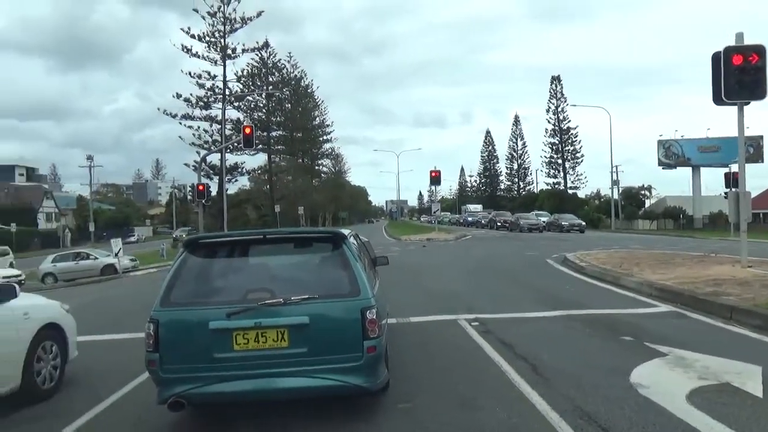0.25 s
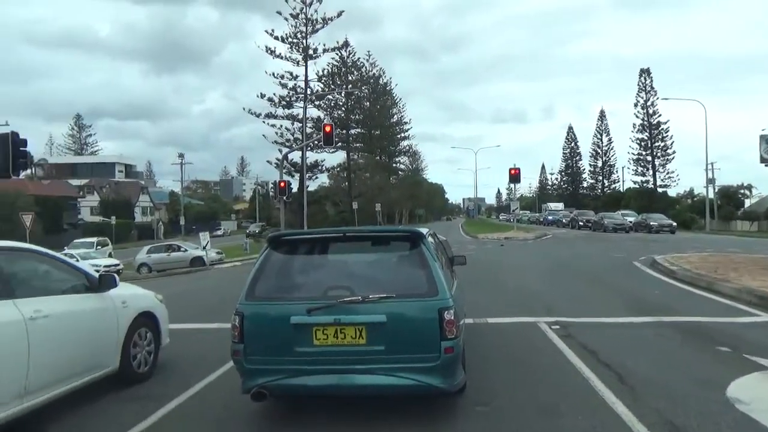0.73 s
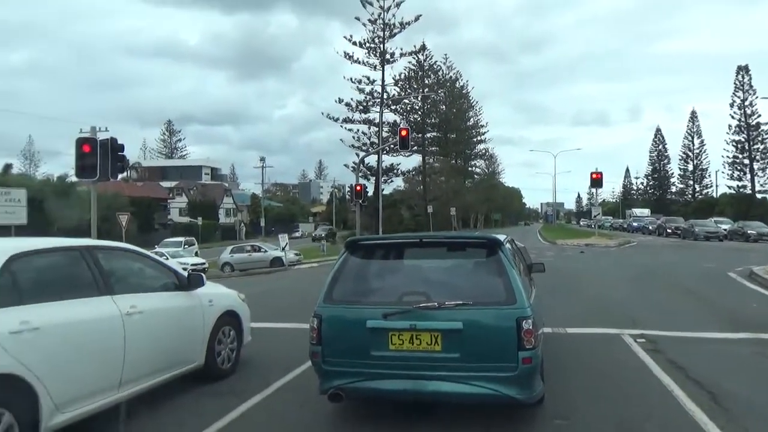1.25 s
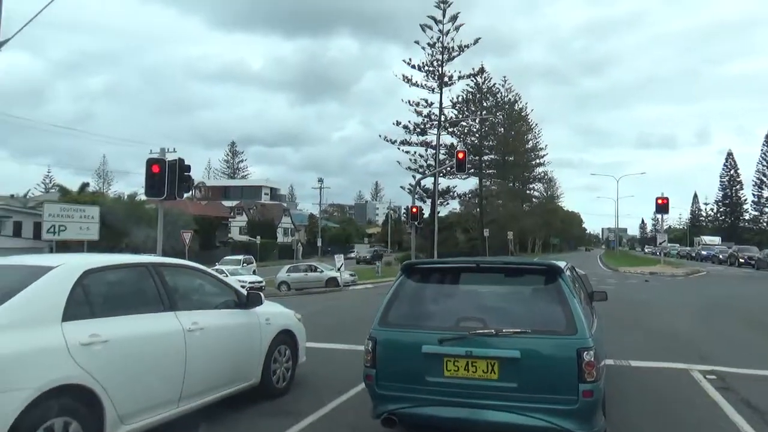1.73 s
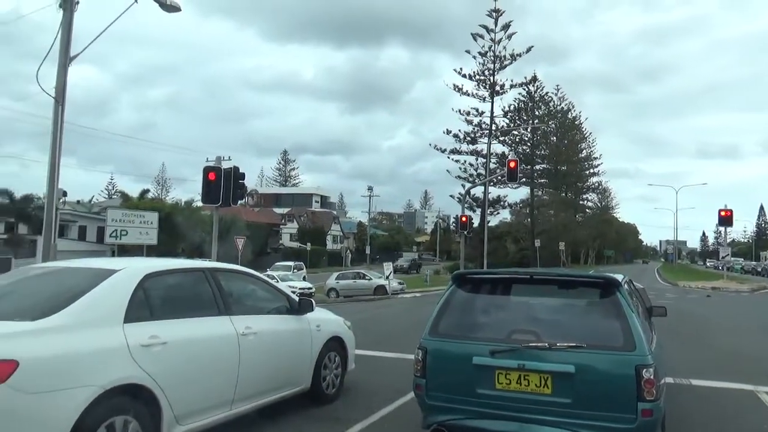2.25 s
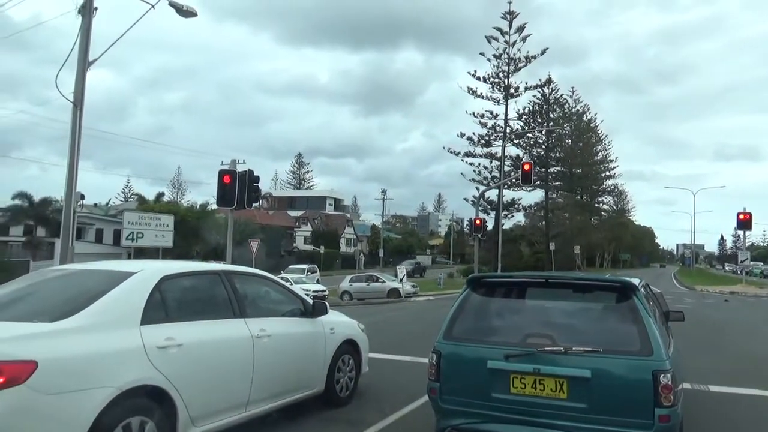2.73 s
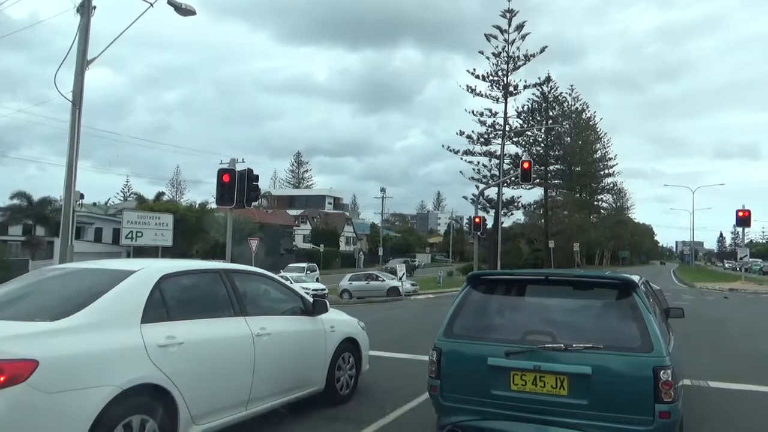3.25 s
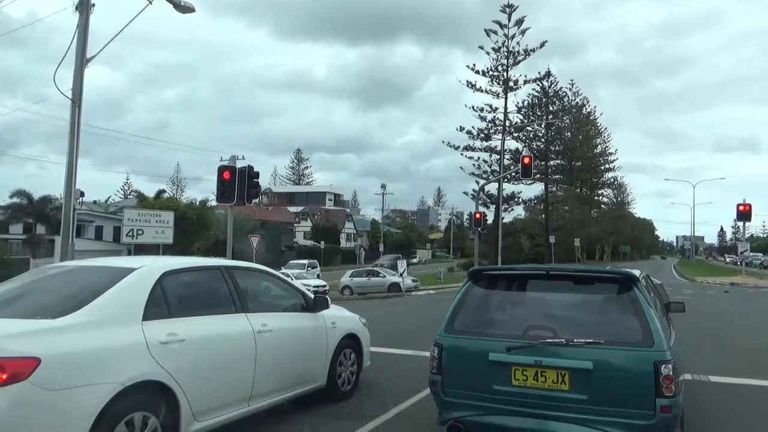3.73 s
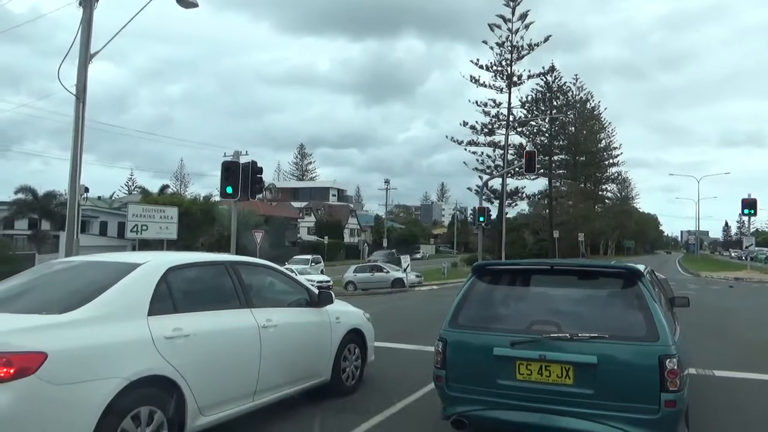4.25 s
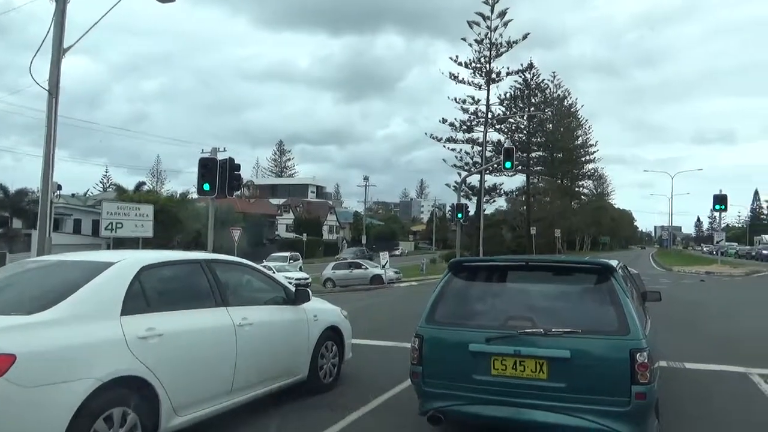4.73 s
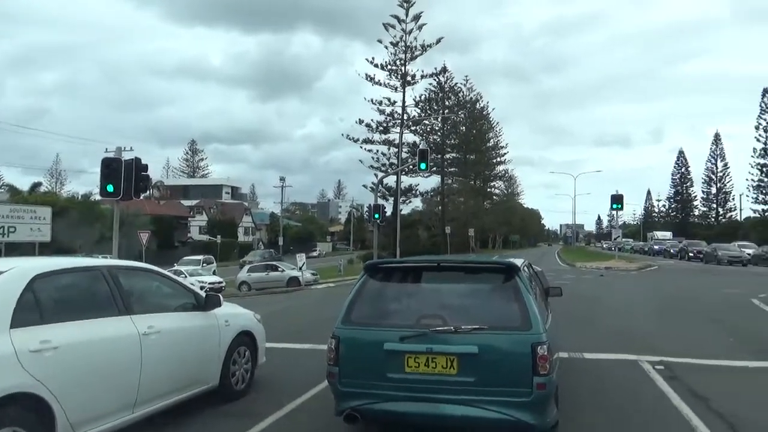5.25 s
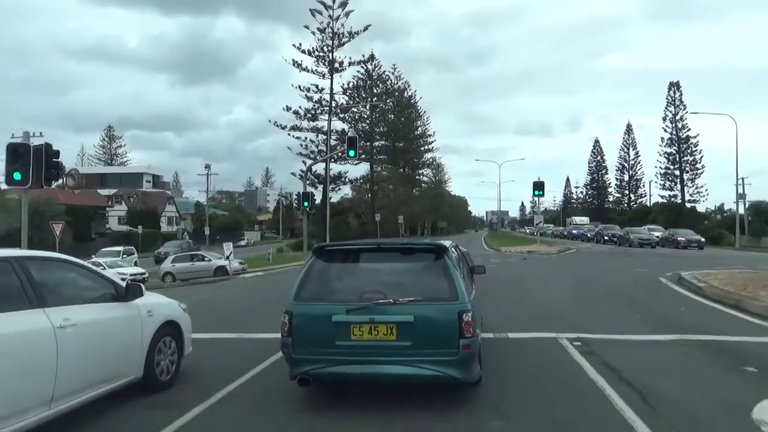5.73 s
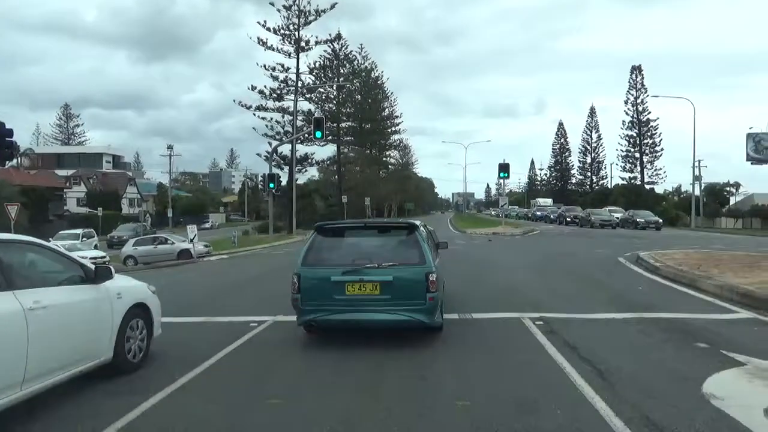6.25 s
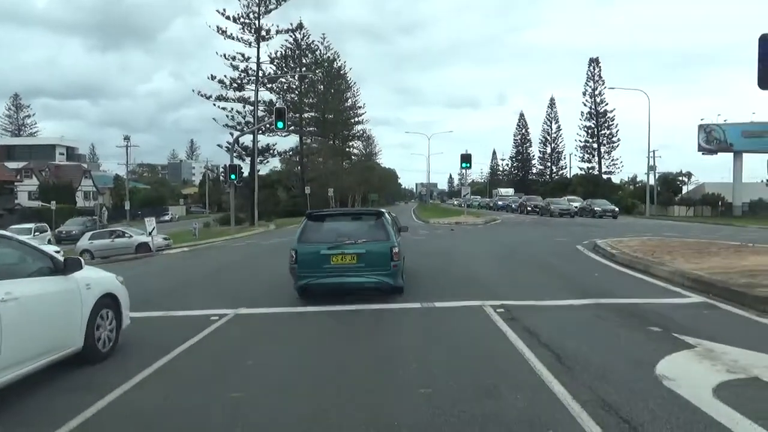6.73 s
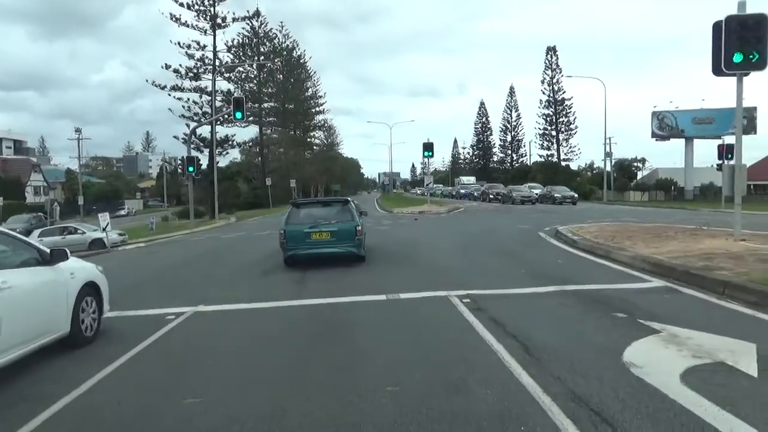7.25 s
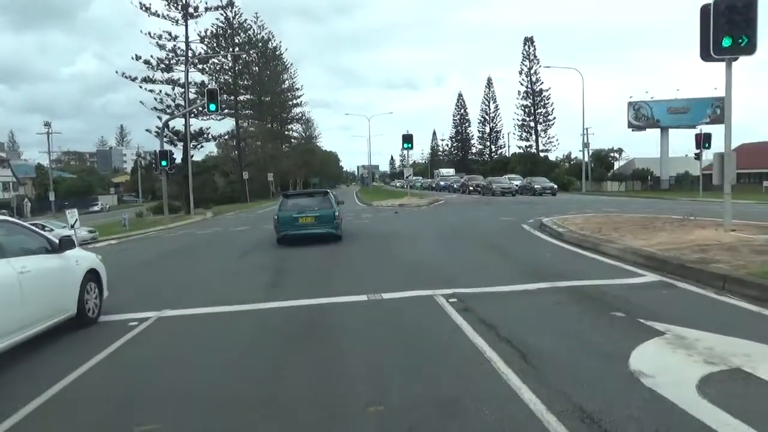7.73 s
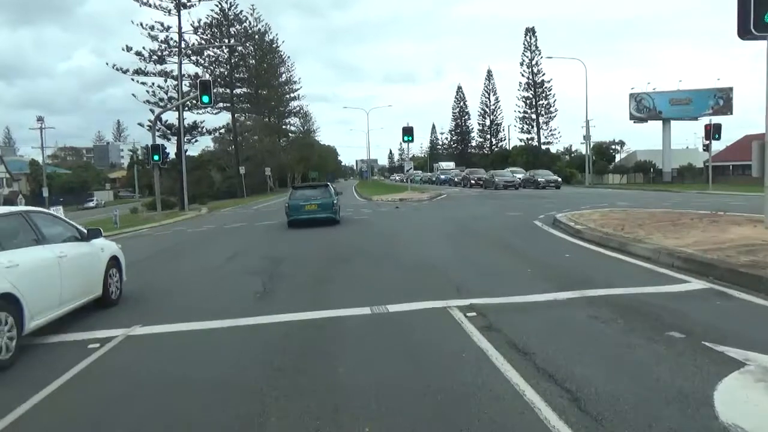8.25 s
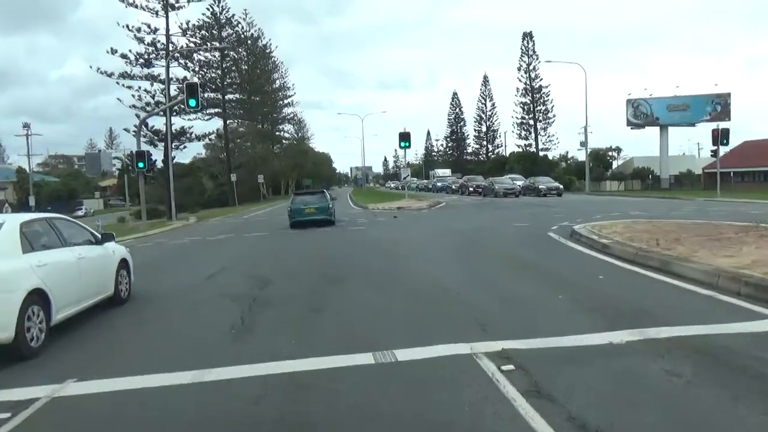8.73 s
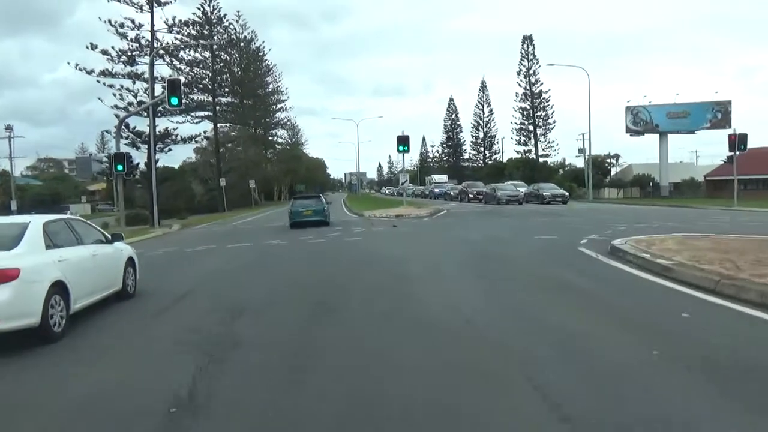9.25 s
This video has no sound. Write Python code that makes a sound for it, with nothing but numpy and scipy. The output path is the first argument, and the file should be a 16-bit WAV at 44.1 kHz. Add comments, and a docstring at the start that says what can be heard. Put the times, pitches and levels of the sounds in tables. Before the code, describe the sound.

Inside the boomy tin cab of an old air-cooled van at traffic lights, the engine idles unevenly with knocks and fan clatter. Near the middle, the gear lever scrapes and trim chatters as revs rise; the car ahead burbles away. The handbrake clunks, the clutch bites with a lurch and thin squeals, and the engine climbs over growing rumble and hiss. Close stereo microphone, bass slightly heavier on the right.

```python
"""Pulling away in an old van

Inside an old air-cooled van at traffic lights. The flat four idles with a lope: noisy knocks, fan clatter
and a drone of firing-rate multiples. A gear goes in with scrapes and chatter, and the engine revs.
The handbrake clunks as a bank of ringing modes; the clutch bites with a lurch and a fluttering squeal tone.
The revs hold until the clutch locks, then climb over filtered-noise rumble and hiss. The car ahead revs
and leaves with a burble of engine-cycle multiples. Everything is heard through the boomy tin cab."""
import sys
import numpy as np
from scipy import signal
from scipy.fft import rfft, irfft
from scipy.io import wavfile
from scipy.ndimage import uniform_filter1d, minimum_filter1d

SR = 44100
rng = np.random.default_rng(int(sys.argv[2]) if len(sys.argv) > 2 else 0)


def waveform_to_disk(signal):
    """Save audio, clipped to [-1, 1], as 16-bit WAV at the path in sys.argv[1]."""
    frames = np.transpose(np.atleast_2d(signal))
    scaled = np.clip(frames, -1, 1) * 32767
    samples = np.round(scaled).astype(np.int16)
    wavfile.write(sys.argv[1], SR, samples)


N = 418950
TIME = np.arange(N) / SR

# engine speed: (time [s], firing rate [firings/s])
SPEED = [(0, 25.4), (.78, 24.1), (1.38, 25.4), (2.1, 24.3), (2.27, 24.8), (2.84, 24.3), (4.07, 24.6),
         (4.23, 25.3), (4.9, 24.9), (5.0, 31.1), (5.7, 33), (6.5, 32), (6.85, 39), (7.01, 50), (7.14, 53),
         (7.5, 52.3), (7.85, 54), (7.98, 50.4), (8.19, 49.4), (8.5, 51.8), (8.64, 55.5), (9.06, 70.6),
         (9.34, 82), (9.5, 86.5)]
# how hard the engine pulls: (time [s], load above idle [dB])
LOAD = [(0, 1), (4.4, 2), (4.85, 4.5), (4.97, 9.5), (5.12, 10), (5.3, 5.5), (6.38, 2.5), (6.8, 4), (7.3, 6),
        (8.05, 5), (8.5, 1.5), (9.15, 8.5), (9.5, 11)]
# the four firings of one cycle: (strength [dB], lag through unequal pipes [firings])
CYLINDERS = [(-0.5, 0), (0.5, 0.05), (-4.5, -0.08), (-6.5, 0.12)]
# the cab's answer to a firing: (frequency [Hz], relative level [dB])
CAB_SPECTRUM = [(20, -45), (45, -1), (80, -21), (105, 5.5), (135, -10), (175, -3.5), (200, 9), (215, -4),
                (238, 7.5), (268, 2), (298, -28.5), (365, -17.5), (410, -17.5), (900, -56)]
# engine clatter: (frequency [Hz], relative density [dB per Hz])
CLATTER_SPECTRUM = [(120, -12.5), (270, -10), (360, 6.5), (400, -12), (500, -1), (600, -6.5), (760, -5.5),
                    (1200, -26), (1750, -18), (2600, -24.5), (4500, -30.5), (7000, -32.5), (11000, -43.5)]
# exhaust drone: (multiple of the firing rate)
DRONE_MULTIPLES = [2, 3, 4, 5, 6, 9]
# one row per drone multiple, before load and boom:
# (idling [dB], revving [dB], clutch slipping [dB], clutch locked [dB])
DRONE_DB = [(-29, -32, -39.5, -27.5), (-28, -42, -35, -47), (-32, -42, -39, -36), (-45.5, -49, -34, -40),
            (-36.5, -37, -40, -39), (-36.5, -54, -45, -43)]
# how pipe and cab favour each pitch of an exhaust: (frequency [Hz], gain [dB])
BOOM = [(48, -2.5), (72, -21.5), (88, -11), (100, -1.5), (119, 1.5), (136, -5.5), (158, -7), (180, -15),
        (202, -5.5), (228, -7.5), (280, -15.5), (345, -6), (425, -18), (530, -4.5), (630, -15.5)]
# the firing rate itself shakes the body through the drive train: (firing rate [Hz], level [dB])
THROB = [(25, -42), (33, -46), (39, -33), (50, -26.5), (56, -24.5), (62, -20), (69, -14), (77, -21),
         (87, -19.5)]
# tone of the exhaust's upper multiples: (frequency [Hz], relative level [dB])
RASP_SPECTRUM = [(170, -10), (260, 3), (310, -2), (365, 8.5), (430, -1.5), (525, 6), (580, -8), (630, -1.5),
                 (700, -8.5), (800, -0.5), (1200, -35)]
# exhaust of the car ahead: (time [s], engine speed [cycles/s], level [dB])
CAR = [(4.95, 11.3, -57), (5.17, 12.1, -17.5), (5.3, 14.4, -13.5), (5.4, 14, -14), (5.58, 13.9, -17),
       (6.03, 12.35, -24), (6.37, 10.95, -22), (6.5, 12.06, -19), (6.62, 13.5, -18), (6.82, 14.55, -15),
       (7.02, 15.8, -17), (7.3, 18.56, -20.5), (7.6, 21.54, -17.5), (7.85, 24.6, -15.5), (8.2, 26.44, -18),
       (8.35, 27.3, -21), (8.65, 23, -37), (9.5, 27, -70)]
# burble of the car ahead: (multiple of its engine cycle)
CAR_MULTIPLES = [5, 8, 10, 11, 13, 15, 16, 17, 19, 21, 24, 27, 37, 45]
# one row per multiple of the car's cycle: (revving [dB], pulling away [dB]), relative to its level
CAR_DB = [(-14, -4), (0, 0), (-22, -13), (-24, -7), (-6, -8), (-16, -17), (0, -5), (-18, -10), (-13, -14),
          (-12, -14), (-10, -17), (-12, -22), (-20, -24), (-11, -24)]
# the handbrake lever hits its stop and bounces: (time [s], gain [dB])
BRAKE_BLOWS = [(6.123, -14), (6.13, -19.5), (6.146, -30)]
# what each blow rings with: (frequency [Hz], relative level [dB], decay by 60 dB [s])
BRAKE_MODES = [(348, -12, 0.18), (440, -8.5, 0.3), (486, 3.5, 0.18), (535, 4.5, 0.25), (678, -10, 0.13),
               (820, -3, .13), (888, -4, 0.18), (1094, -19, .15), (1210, -19, .12), (2096, -22, 0.11)]
# the noisy crack of each blow: (frequency [Hz], relative density [dB per Hz])
BRAKE_CRACK = [(250, -12.5), (500, 16), (950, 11.5), (1300, 2), (2500, -13.5), (3100, -14), (3800, -9),
               (4500, -16), (7600, -22), (11000, -27)]
# squeals of the clutch: (time [s], length [s], level [dB], pitch [Hz], glide [Hz/s], flutter [0-1])
SQUEAL = [(6.65, 0.064, -40, 3930, -800, 0.15), (6.727, 0.14, -35, 3896, -160, 0.13),
          (6.895, 0.069, -40.5, 3848, -300, 0.28), (6.985, 0.046, -44.5, 3830, -250, 0.37),
          (7.038, 0.097, -39.5, 3799, -140, 0.24), (7.16, 0.24, -44.5, 3780, -71, 0.68),
          (7.33, 0.16, -38.5, 3793, 90, 0.43), (7.51, 0.053, -36, 3811, 500, 0.24),
          (7.595, 0.015, -42, 3856, 303, 0.27), (7.635, 0.06, -56, 3900, 201, 0.57),
          (8.452, 0.055, -41.5, 3763, 100, 0.5), (8.54, .035, -49, 3800, 299, 0.37),
          (9.035, 0.043, -47.5, 3780, -5, 0.2), (9.475, 0.044, -52, 3760, 0, 0.3)]
# the fan belt's scuff: (frequency [Hz], relative density [dB per Hz])
BELT_SPECTRUM = [(300, -32), (420, -2.5), (500, 4.5), (590, -7), (720, -5), (830, -12.5), (1100, -24.5),
                 (3000, -43)]
# tin panels that buzz: (frequency [Hz], width [Hz], level at no load [dB], growth with load [dB per dB])
PANELS = [(117.2, 33, -33.5, 1.91), (257.8, 43.4, -25.5, 0.25), (636, 190, -47, 0.87)]
# loose trim as the gear goes in and during the rev:
# (time [s], length [s], level [dB], frequency [Hz], width [Hz])
CHATTER = [(4.858, 0.12, -40.5, 2400, 1700), (5.205, 0.22, -52, 3200, 600)]
# scrapes of gear lever, seat and trim: (time [s], length [s], level [dB], bright share [0-1])
SCRAPES = [(4.637, 0.17, -39.5, 1), (4.76, 0.26, -41.5, 1), (4.849, 0.029, -29.5, 0), (4.865, 0.14, -33, 0),
           (4.974, 0.24, -41.5, 0.53), (5.152, 0.35, -37.5, 0.12), (5.413, 0.15, -42.5, 0.98),
           (5.545, 0.14, -41, 0.98), (5.882, 0.024, -39, 0.1), (6.24, 0.077, -41, 0.05),
           (6.312, 0.042, -40, 0.1), (6.515, 0.039, -25, 0.01), (6.543, 0.073, -31, 0.01),
           (6.611, 0.048, -27.5, 0.02), (7.027, 0.19, -36.5, 0.23), (7.622, 0.033, -30, 0.02)]
# tone of a dull scrape: (frequency [Hz], relative density [dB per Hz])
DULL = [(300, -7), (550, 5), (900, 2.5), (1300, -5), (1800, -6.5), (2400, -13.5), (3300, -17),
        (4500, -25.5), (11000, -37)]
# tone of a bright scrape: (frequency [Hz], relative density [dB per Hz])
BRIGHT = [(800, 16), (2000, 8), (4000, 3.7), (6000, 2.3), (8500, 8.2), (11000, 0.5)]
# ticks of loose fittings: (time [s], relative level [dB], pitch [Hz])
TICKS = [(0.999, -41, 5560), (1.2226, -41.5, 3630), (1.381, -43, 2781), (2.473, -36, 2720),
         (2.882, -42, 6400), (3.2784, -45, 2920), (3.6586, -43, 2870), (4.039, -44, 2860),
         (4.719, -33, 1500), (4.861, -23.5, 1100), (5.036, -35, 2730), (5.2944, -37, 3060),
         (5.3757, -45, 3100), (5.4124, -30.5, 2410), (5.636, -29, 2720), (7.068, -31.5, 2994),
         (7.165, -31.5, 2920), (7.8097, -34, 2800), (8.351, -37, 3122)]
# rolling rumble: (frequency [Hz], relative density [dB per Hz])
RUMBLE_SPECTRUM = [(12, -48), (28, -6), (52, -5.5), (85, -4), (140, 1.5), (200, -4.5), (400, -10.5),
                   (650, -24), (1050, -20.5), (1600, -32.5), (3000, -37.5), (5000, -53), (11000, -56.5)]
# air hiss: (frequency [Hz], relative density [dB per Hz])
HISS_SPECTRUM = [(1500, -2), (4000, -3.5), (5500, -10), (6700, -3.5), (7400, -4), (8800, 1.5), (10000, -1),
                 (11000, -12.5)]
# balance of the two ports: (frequency [Hz], left minus right [dB])
LEFT_DB = [(25, -3), (60, -4), (120, -8), (240, -9), (400, -5), (700, -1.5), (2000, 1), (11000, 0.5)]
# phase between the two ports: (frequency [Hz], left lead [rad])
LEFT_LEAD = [(20, -0.63), (60, -0.76), (120, -0.77), (260, -0.73), (600, -0.37), (1500, 0.44),
             (11000, 0.62)]
# sound off the cab walls: (frequency [Hz], level [dB])
DIFFUSE = [(30, -20), (120, -10), (260, -10.5), (600, -7.5), (1200, -5), (11000, -11.5)]

# changes between the four stages (idling, revving, clutch slipping, clutch locked): (time [s], length [s])
THROTTLE_OPENS, CLUTCH_BITES, CLUTCH_LOCKS = (4.91, 0.026), (6.52, 0.092), (8.55, 0.7)
# levels in the four stages [dB]; load adds to knock, clatter and rasp, engine speed adds to clatter
KNOCK_DB, CLATTER_DB = (-33, -38, -46, -37.5), (-41, -43, -36.5, -35)
RASP_DB, BELT_DB = (-62, -38, -36, -40.5), (-46.5, -45.5, -42.5, -38)
BODY_SHAKE_DB, SHELL_BOOM_DB = (-36, -39, -32.5, -26.5), (-35, -40.5, -32.5, -32)
CLATTER_DB_PER_OCTAVE = 1.5  # growth with engine speed
CLATTER_PER_LOAD, RASP_PER_LOAD = 0.11, 0.43  # growth with load [dB per dB]
CAR_PULLS = (6.47, 1)  # the car ahead goes from revving to pulling away: (time [s], length [s])
BELT_LAP = (5.09, 0.25)  # the belt's stiff spot: (lap [firings], wait until it first lands [firings])
PULL_AWAY_S = 2.16  # from the bite of the clutch to road speed
ROLL_DB, WIND_DB, STILL_AIR_DB = -23, -48, -61  # rumble and hiss at road speed; hiss at a standstill
JOLT_DB, JOLT_S = -21.5, 0.22  # the body lurches as the clutch bites
# the brakes rub while the van creeps up to the queue, then ease: (time [s], length [s])
BRAKE_HISS_DB, BRAKES_EASE = -54.5, (0.86, 0.51)
# the cab booms as the pull builds: (frequency [Hz], width [Hz], level [dB], time [s], swell [s])
CAB_BOOM = (151, 45, -23, 9, 0.2)
# the body bounces as the clutch bites: (frequency [Hz], width [Hz], level [dB], time [s], decay [s])
LURCH = (37, 16, -23, 6.54, 0.4)
EDGE_HZ = 11100  # top of the microphone's band


def van(firing_turn=0.2459, spread_db=1.7, puff=0.47, puff_length=0.82, rattle_db=0.5, lope_db=0.5,
        whirr_db=-53):
    """Four uneven cylinders knock in the cab; valves and fan clatter in step with them."""
    rate, load_db = curves(SPEED)[0], curves(LOAD)[0]
    knock_db = staged(*KNOCK_DB) + load_db
    speed_db = CLATTER_DB_PER_OCTAVE * np.log2(rate / rate.min())
    clatter_db = staged(*CLATTER_DB) + CLATTER_PER_LOAD * load_db + speed_db

    # count the firings and the phase since the last one, bent by the unequal pipes
    turns = np.cumsum(rate) / SR - firing_turn
    count = len(CYLINDERS)
    cylinder_db, lag = np.transpose(CYLINDERS)
    lag = np.interp(turns, np.arange(count), lag, period=count)
    firing, since = np.divmod(turns - lag + count, 1)
    firing = firing.astype(int)

    # each firing is a blow and a short puff of gas, no two alike
    uneven_db = spread_db * rng.standard_normal(N)[firing]
    strength = gain_of(np.take(cylinder_db, firing, mode="wrap") + uneven_db)
    blows = evened(strength * (np.diff(firing, prepend=firing[0]) > 0))
    burst = strength * np.exp(-since / puff_length)
    knock = colour(blows + puff * evened(burst * rng.standard_normal(N)), CAB_SPECTRUM)
    # the floor pan holds back the bass of each blow around 141 Hz and lets it out late
    knock = steady(knock - 2 * ring(knock, 141.0, 25.0))

    # tappets click twice per firing over the rush of the cooling fan
    tappets = np.exp(-(2 * since % 1) / 0.27)
    clatter = colour((1 + 0.058 * tappets + 0.14 * burst) * rng.standard_normal(N), CLATTER_SPECTRUM)
    # the valve gear rings around 1.5 kHz, swelling once per firing
    whirr_drive = (0.17 + np.exp(-since / 0.6)) * rng.standard_normal(N)
    whirr = evened(ring(ring(whirr_drive, 1530, 220), 1410, 350))

    # loose panels make the low clatter come and go; one cylinder jogs them once per cycle
    lope = (firing % count == 0) - 1 / count
    low_clatter = signal.sosfiltfilt(signal.butter(2, 950, fs=SR, output="sos"), clatter)
    rattle = gain_of(rattle_db * wander(36) + lope_db * lope * rate.min() / rate)
    clatter = evened(clatter + low_clatter * (rattle - 1))
    whirr_level = gain_of(whirr_db + staged(0, -5.5, -1.5, 0))
    return gain_of(knock_db) * knock + gain_of(clatter_db) * clatter + whirr_level * whirr


def exhaust(flutter=0.33, rasp_flutter=0.61, jitter_rad=0.048, count=19):
    """Multiples of the firing rate drone as they sweep the cab's resonances; the others add a rasp."""
    rate, load_db = curves(SPEED)[0], curves(LOAD)[0]
    angle = 2 * np.pi * np.cumsum(rate) / SR
    levels_db = [read(THROB, rate)]
    for k, stages_db in zip(DRONE_MULTIPLES, DRONE_DB):
        levels_db.append(staged(*stages_db) + load_db + read(BOOM, k * rate))
    drone = np.zeros(N)
    for k, db in zip([1, *DRONE_MULTIPLES], levels_db):
        waver = 1 + flutter * wander(17) * rate.min() / rate
        drone += gain_of(db) * waver * np.sin(k * angle)

    # uneven firings roughen the rasp, most at speed
    jitter = jitter_rad * wander(23.0) * rate / rate.mean()
    rasp = np.zeros(N)
    for k in range(2, count):
        if k not in DRONE_MULTIPLES:
            waver = 1 + rasp_flutter * wander(15.5)
            tone = np.sin(k * (angle + jitter) + 2 * np.pi * rng.random())
            rasp += gain_of(read(RASP_SPECTRUM, k * rate)) * waver * tone
    rasp_db = staged(*RASP_DB) + RASP_PER_LOAD * load_db
    return np.sqrt(2) * drone + gain_of(rasp_db) * steady(rasp)


def car_ahead(flutter=0.1, upper_flutter=0.25):
    """A flat four with unequal pipes burbles on multiples of its cycle, which boom in the cab's resonances."""
    rate, level_db = curves(CAR)
    rate = uniform_filter1d(rate, SR // 12)  # the flywheel rounds every change of speed
    angle, pulling = 2 * np.pi * np.cumsum(rate) / SR, change(*CAR_PULLS)
    out = np.zeros(N)
    for k, (revving_db, pulling_db) in zip(CAR_MULTIPLES, CAR_DB):
        stage_db = revving_db + (pulling_db - revving_db) * pulling
        db = level_db + stage_db + read(BOOM, k * rate)
        depth = flutter if k in CAR_MULTIPLES[:2] else upper_flutter
        waver = 1 + depth * wander(10.7)
        out += gain_of(db) * waver * np.sin(k * angle + 2 * np.pi * rng.random())
    return np.sqrt(2) * out


def handbrake(crack_db=1.0, crack_t60=0.11, snap_s=6.1208, snap_db=-13, snap_hz=3600, snap_width_hz=900,
              snap_t60=0.02):
    """The ratchet snaps free, the lever slams down on its stop and the floor pan rings."""
    t, out = np.arange(SR // 2) / SR, np.zeros(N)
    modes = np.zeros(len(t))
    for hz, db, t60 in BRAKE_MODES:
        modes += gain_of(db - 60 * t / t60) * np.sin(2 * np.pi * (hz * t + rng.random()))
    rattle = colour(rng.standard_normal(N), BRAKE_CRACK)
    onset = 1 - np.exp(-t / 0.0012)
    for s, db in BRAKE_BLOWS:
        crack = gain_of(crack_db - 60 * t / crack_t60) * rattle[round(s * SR):][:len(t)]
        add(out, s, gain_of(db) * (modes + crack) * onset)
    snap = evened(ring(rng.standard_normal(len(t)), snap_hz, snap_width_hz))
    add(out, snap_s, gain_of(snap_db - 60 * t / snap_t60) * snap)
    return out


def squeal(octave_db=-9, waver_hz=7, swing_hz=22, stutter_db=4, pulse_db=5, attack_s=0.013,
           release_s=0.012):
    """A stick-slip tone and its octave; the shuddering clutch makes it stutter and waver."""
    shake = np.sin(2 * np.pi * np.cumsum(curves(SPEED)[0]) / SR / 2)  # once per crank turn
    level, pitch, flutter = np.zeros((3, N))
    for s, length, db, hz, glide, rough in SQUEAL:
        t = TIME - s
        level += gain_of(db) * change(s, attack_s) * np.exp(-np.maximum(t - length, 0) / release_s)
        pitch = np.where(t > -attack_s, hz + glide * t, pitch)
        flutter = np.where(t > -attack_s, rough, flutter)
    swing = flutter * swing_hz * (shake + wander(70))
    angle = 2 * np.pi * np.cumsum(pitch + waver_hz * wander(42) + swing) / SR
    level = level * gain_of(flutter * (stutter_db * wander(87) + pulse_db * shake))
    octave = 2 * flutter * gain_of(octave_db) * np.sin(2 * angle)
    return np.sqrt(2) * level * (np.sin(angle) + octave)


def belt(sharpness=2.2, slap=1.0, slap_laps=0.1):
    """The fan belt scuffs and slaps on its pulley once a lap, out of step with the cylinders."""
    lap_firings, first_firings = BELT_LAP
    laps = (np.cumsum(curves(SPEED)[0]) / SR - first_firings) / lap_firings
    scuff = np.exp(sharpness * (np.cos(2 * np.pi * laps) - 1))
    scuff += slap * np.exp(-(laps % 1) / slap_laps)
    return gain_of(staged(*BELT_DB)) * colour(scuff * rng.standard_normal(N), BELT_SPECTRUM)


def panels(rolling_db=-11):
    """The throttle shakes the cab's panels into a fuzzy buzz, strongest while the engine revs freely."""
    load_db = curves(LOAD)[0]
    drive = staged(0, 0.8, gain_of(rolling_db), gain_of(rolling_db))
    noise, buzz = rng.standard_normal(N), np.zeros(N)
    for hz, width, db, growth in PANELS:
        buzz += gain_of(db + growth * load_db) * steady(ring(ring(noise, hz, width), hz, width))
    return drive * buzz


def body():
    """The body bounces at the bite of the clutch and booms as the pull builds: two bands of noise."""
    def band(hz, width, db):
        return gain_of(db) * steady(ring(ring(rng.standard_normal(N), hz, width), hz, width))
    bite_s, decay_s = LURCH[3:]
    decay = np.exp(-np.maximum(TIME - bite_s, 0) / decay_s)
    bounce = band(*LURCH[:3]) * change(bite_s, 0.05) * decay
    return bounce + band(*CAB_BOOM[:3]) * change(*CAB_BOOM[3:])


def chatter(decay_firings=1.0, uneven_db=2.0, edge_s=0.053):
    """Loose pieces of trim buzz once per firing."""
    since = np.cumsum(curves(SPEED)[0]) / SR % 1
    taps = np.exp(-since / decay_firings) * gain_of(uneven_db * wander(44)) * rng.standard_normal(N)
    out = np.zeros(N)
    for s, length, db, hz, width in CHATTER:
        gate = change(s, edge_s) - change(s + length, edge_s)
        out += gain_of(db) * gate * evened(ring(ring(taps, hz, width), hz, width))
    return out


def scrapes(grain_db=1.0, taper=0.52):
    """Short strokes of grainy friction, dull or bright."""
    grains = rng.standard_normal(N) * gain_of(grain_db * wander(160))
    dull, bright, out = colour(grains, DULL), colour(grains, BRIGHT), np.zeros(N)
    for s, length, db, share in SCRAPES:
        share = np.clip(share, 0, 1)
        span = slice(round(s * SR), round((s + length) * SR))
        stroke = evened(np.sqrt(1 - share) * dull[span] + np.sqrt(share) * bright[span])
        add(out, s, gain_of(db) * stroke * signal.windows.tukey(len(stroke), taper))
    return out


def ticks(t60=0.084, width_hz=700, crack=0.51, level_db=-7):
    """Each tick is a dry crack with one broad ring."""
    t, out = np.arange(SR // 10) / SR, np.zeros(N)
    for s, db, hz in TICKS:
        noise = rng.standard_normal(len(t))
        tick = evened(ring(noise, hz, width_hz)) + crack * noise
        add(out, s, gain_of(db + level_db - 60 * t / t60) * tick)
    return out


def road(lumps_db=1.5, flicker_db=1.25):
    """Tyres and bodywork rumble, the shell booms near 50 Hz, and air hisses in as the van gathers speed."""
    moving_s = np.maximum(TIME - CLUTCH_BITES[0], 0)
    pace = np.minimum(moving_s / PULL_AWAY_S, 1)
    jolt = gain_of(JOLT_DB) * change(*CLUTCH_BITES) * np.exp(-moving_s / JOLT_S)
    brakes = gain_of(BRAKE_HISS_DB) * (1 - change(*BRAKES_EASE))
    # independent causes add as powers
    shaking = np.sqrt(gain_of(staged(*BODY_SHAKE_DB)) ** 2 + gain_of(ROLL_DB) ** 2 * pace + jolt ** 2)
    air = np.sqrt(gain_of(STILL_AIR_DB) ** 2 + (gain_of(WIND_DB) * pace) ** 2 + brakes ** 2)
    rumble = colour(rng.standard_normal(N) * gain_of(lumps_db * wander(37)), RUMBLE_SPECTRUM)
    shell = evened(ring(ring(rng.standard_normal(N), 57.5, 22), 49.5, 32))
    hiss = colour(rng.standard_normal(N) * gain_of(flicker_db * wander(40)), HISS_SPECTRUM)
    return shaking * rumble + gain_of(staged(*SHELL_BOOM_DB)) * shell + air * hiss


def cab_stereo(x, t60=0.066, first_s=0.0054):
    """Two close microphone ports: the bass is stronger on the right, wall reflections widen the treble."""
    t, hz = np.arange(SR // 5) / SR, np.fft.rfftfreq(N, 1 / SR)
    walls = rng.standard_normal(len(t)) * gain_of(-60 * t / t60) * (t > first_s)
    side = rfft(walls / np.linalg.norm(walls), N) * gain_of(read(DIFFUSE, hz))
    # half of the level and phase difference goes to each port
    lean = gain_of(read(LEFT_DB, hz) / 2) * np.exp(.5j * read(LEFT_LEAD, hz))
    ports = np.array([lean + side, 1 / lean - side]) * 2 / abs(lean + 1 / lean)
    return irfft(rfft(x) * ports, N)


def gain_of(db):
    """Decibels to a factor."""
    return 10 ** (np.asarray(db) / 20)


def evened(x):
    """Scales to rms 1."""
    return x / np.sqrt(np.mean(x ** 2) + 1e-20)


def steady(x, size=11025):
    """Holds the running power at 1, so that a level curve sets the loudness."""
    return x / np.sqrt(uniform_filter1d(x ** 2, size) + 1e-9)


def curves(rows):
    """Each column of a timed table, joined by straight lines."""
    s, *columns = np.transpose(rows)
    return [np.interp(TIME, s, c) for c in columns]


def read(points, hz):
    """A spectrum joined on a log-frequency axis."""
    f, value = np.transpose(points)
    return np.interp(np.log(hz + 1), np.log(f + 1), value)


def change(s, length):
    """Goes smoothly from 0 to 1 around time s."""
    return .5 + .5 * np.sin(np.pi * np.clip((TIME - s) / length, -.5, .5))


def staged(idling, revving, slipping, locked):
    """A value that follows the four stages of pulling away."""
    return (idling + (revving - idling) * change(*THROTTLE_OPENS)
            + (slipping - revving) * change(*CLUTCH_BITES)
            + (locked - slipping) * change(*CLUTCH_LOCKS))


def wander(hz):
    """Random motion that fades out above a rate, rms 1."""
    f = np.fft.rfftfreq(N, 1 / SR)
    return evened(irfft(rfft(rng.standard_normal(N)) * np.exp(-(f / hz) ** 2), N))


def ring(x, hz, width_hz):
    """One resonance of gain 1."""
    return signal.lfilter(*signal.iirpeak(hz, hz / width_hz, fs=SR), x)


def colour(x, points, size=8192):
    """Causal filter with a given spectrum, scaled to rms 1: it rings after each blow, never before."""
    log_gain = np.log(gain_of(read(points, abs(np.fft.fftfreq(size, 1 / SR)))))
    minimum_phase = np.exp(np.conj(signal.hilbert(log_gain)))
    response = np.fft.ifft(minimum_phase).real[:size // 2]
    return evened(signal.oaconvolve(x, response)[:N])


def add(mix, s, sound):
    """Lays a sound into the mix at time s."""
    part = mix[round(s * SR):][:len(sound)]
    part += sound[:len(part)]


def scene():
    """All sources meet in the cab."""
    engine = van() + exhaust() + belt()
    clutch_and_brake = handbrake() + squeal()
    bodywork = panels() + body() + chatter() + scrapes() + ticks()
    return cab_stereo(engine + car_ahead() + clutch_and_brake + bodywork + road())


def record(dry, low_hz=18, limit_db=-3.5):
    """The microphone sheds the deepest rumble, a limiter holds the loudest swells; then the band limit."""
    thinned = signal.sosfilt(signal.butter(2, low_hz, "high", fs=SR, output="sos"), dry)
    headroom = np.minimum(gain_of(limit_db) / (abs(thinned).max(0) + 1e-9), 1)
    limited = thinned * uniform_filter1d(minimum_filter1d(headroom, size=700), size=500)
    band_limit = signal.firwin(1023, EDGE_HZ, window=("kaiser", 9), fs=SR)
    return signal.oaconvolve(limited, band_limit[None], "same")


dry = scene()
out = record(dry)
waveform_to_disk(out)
```